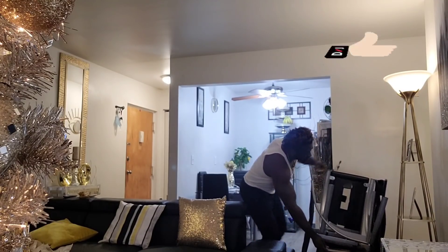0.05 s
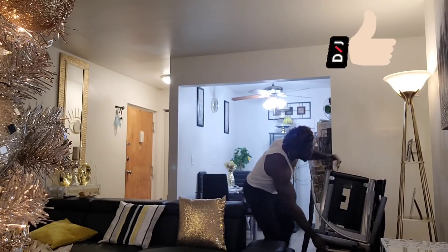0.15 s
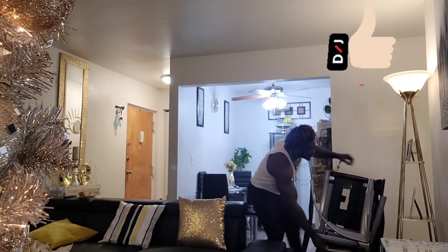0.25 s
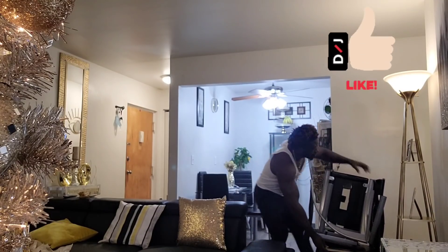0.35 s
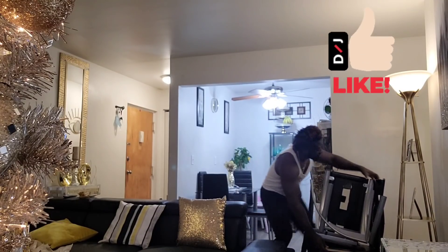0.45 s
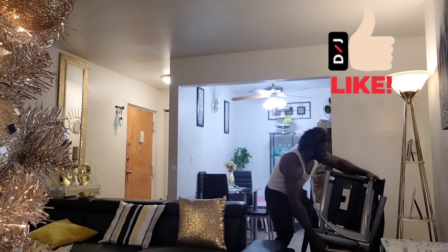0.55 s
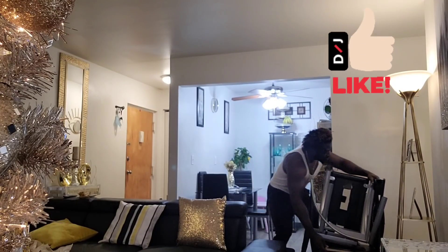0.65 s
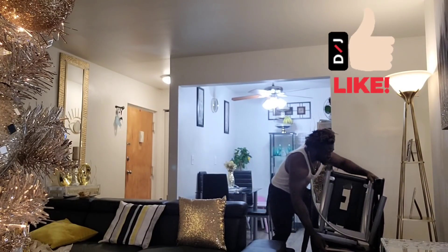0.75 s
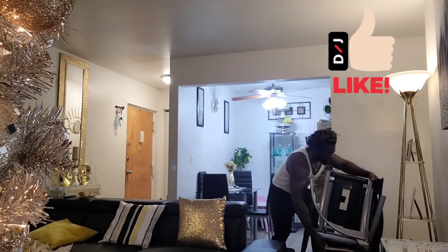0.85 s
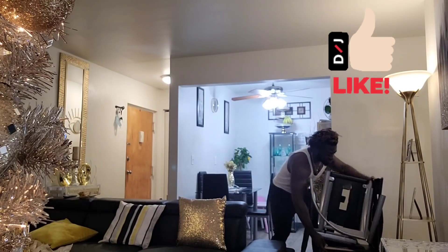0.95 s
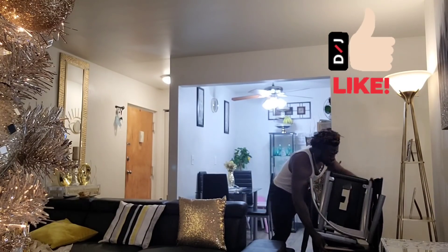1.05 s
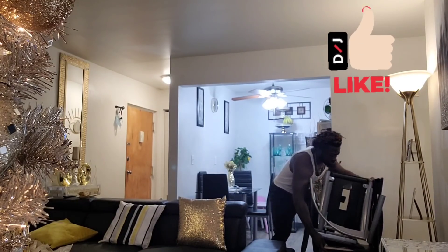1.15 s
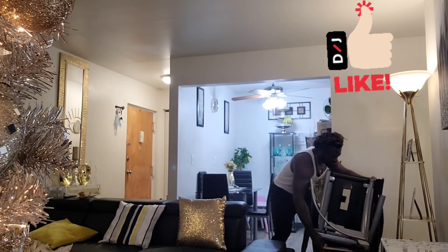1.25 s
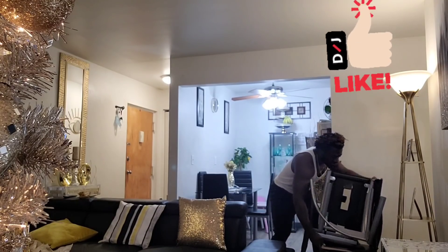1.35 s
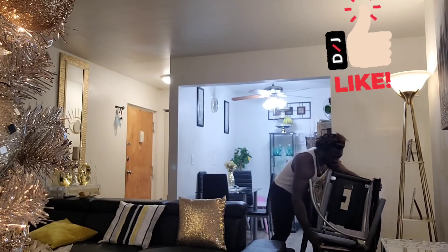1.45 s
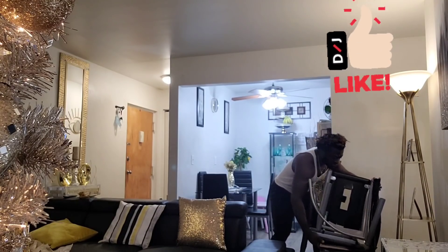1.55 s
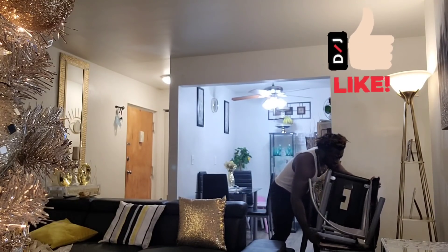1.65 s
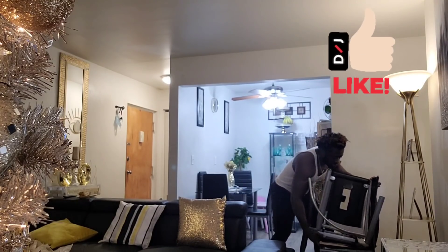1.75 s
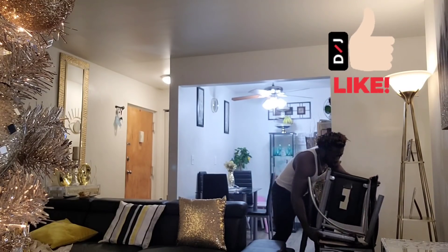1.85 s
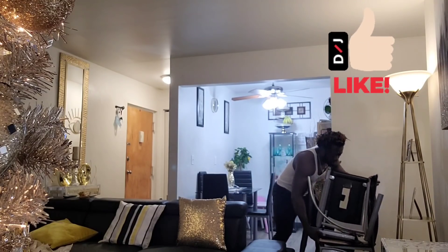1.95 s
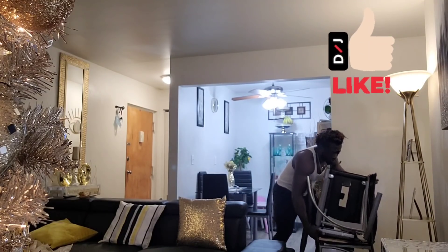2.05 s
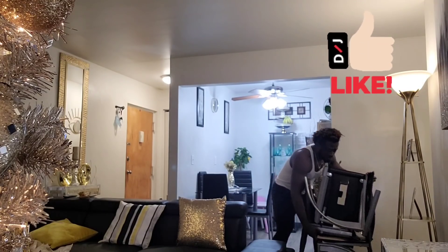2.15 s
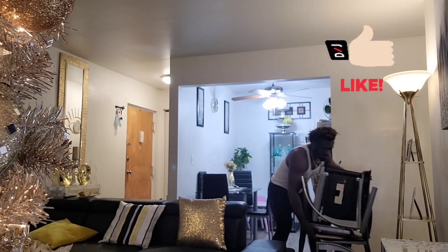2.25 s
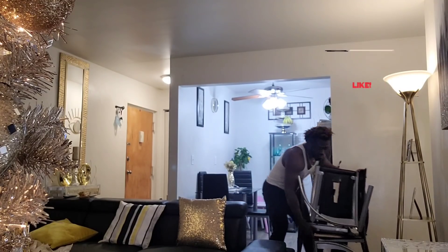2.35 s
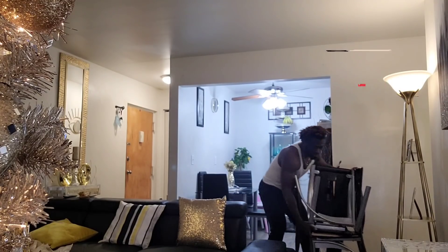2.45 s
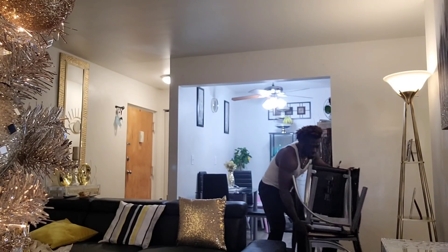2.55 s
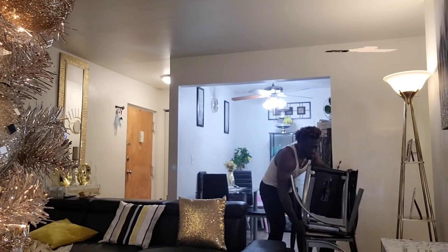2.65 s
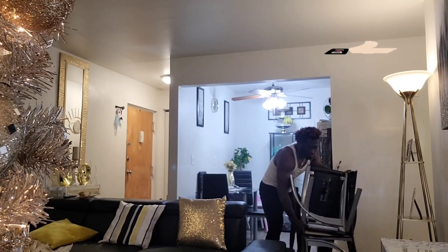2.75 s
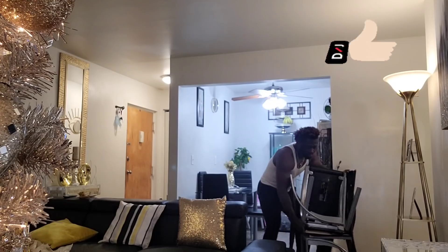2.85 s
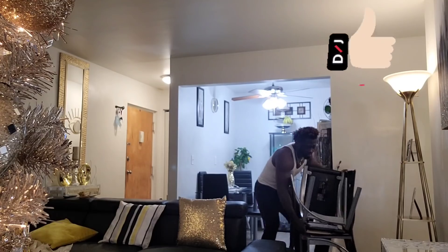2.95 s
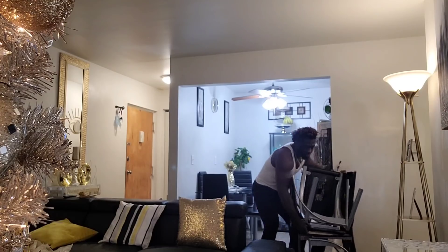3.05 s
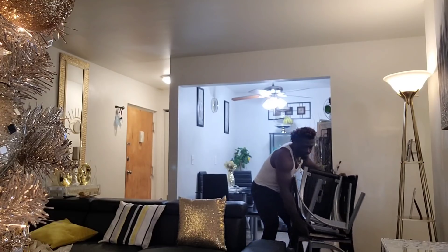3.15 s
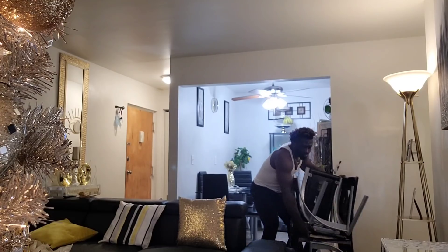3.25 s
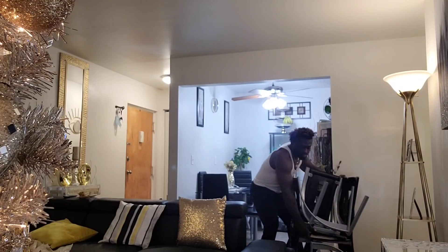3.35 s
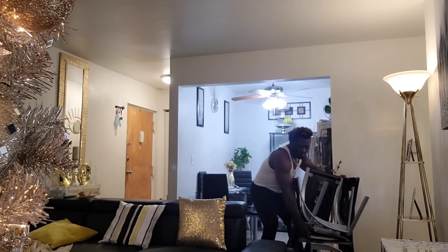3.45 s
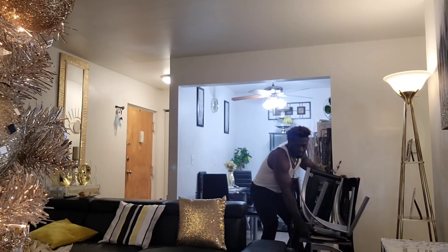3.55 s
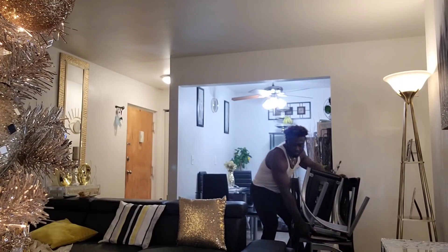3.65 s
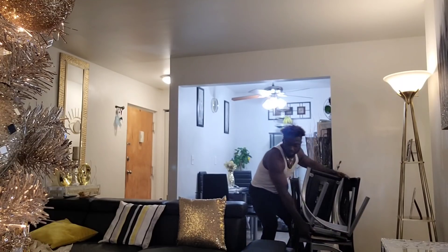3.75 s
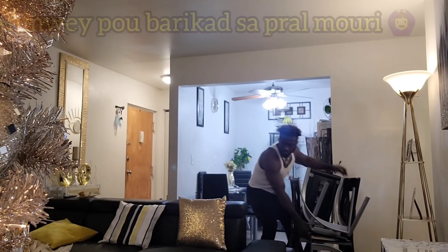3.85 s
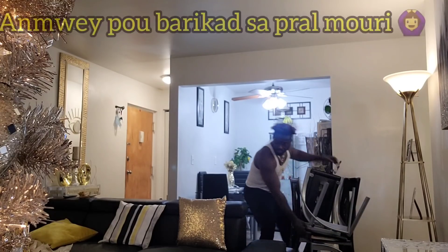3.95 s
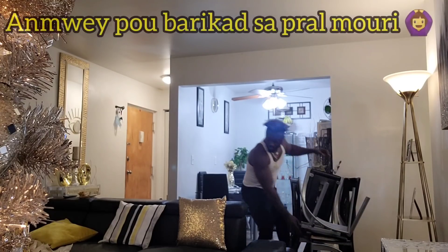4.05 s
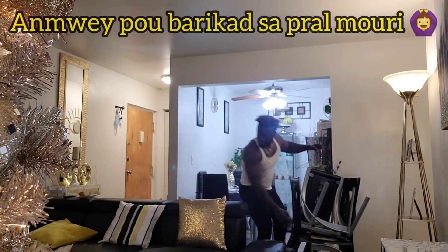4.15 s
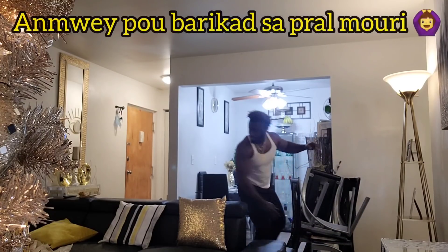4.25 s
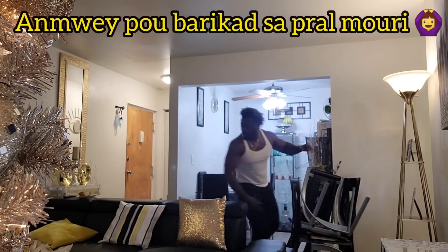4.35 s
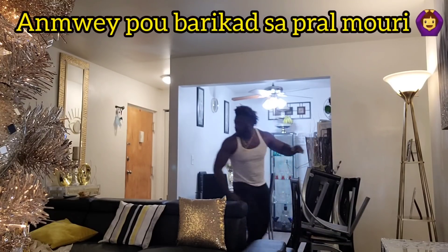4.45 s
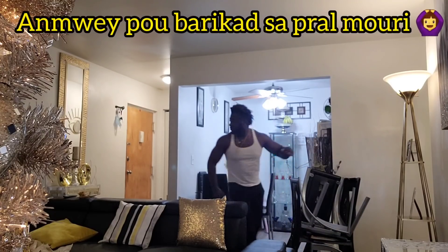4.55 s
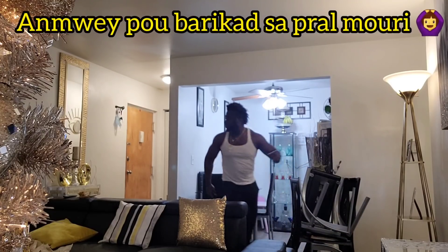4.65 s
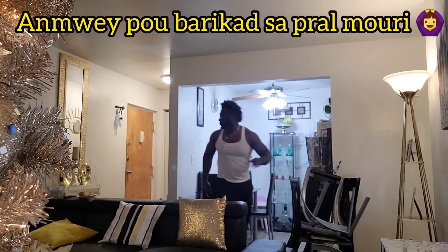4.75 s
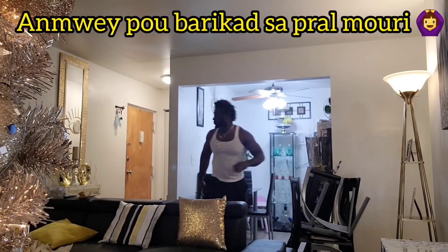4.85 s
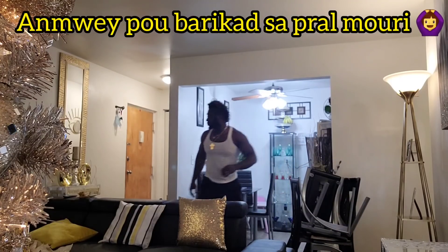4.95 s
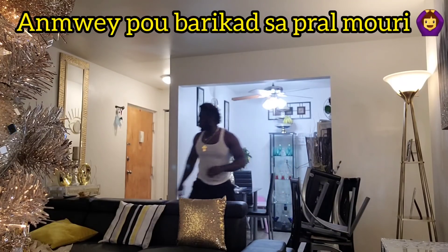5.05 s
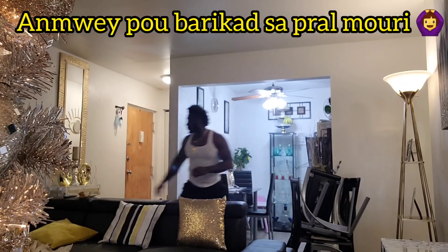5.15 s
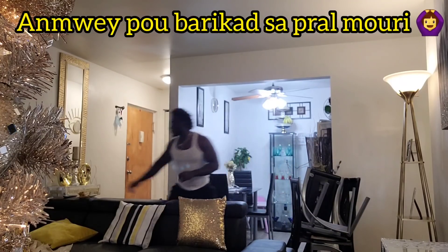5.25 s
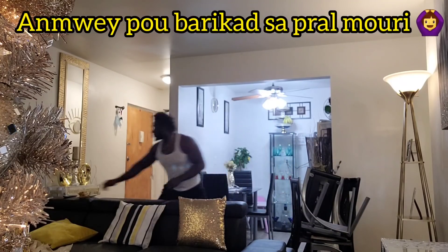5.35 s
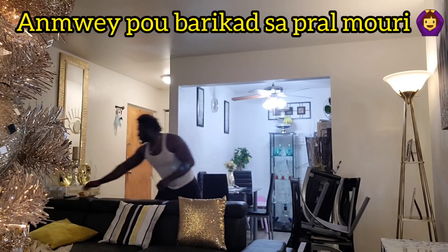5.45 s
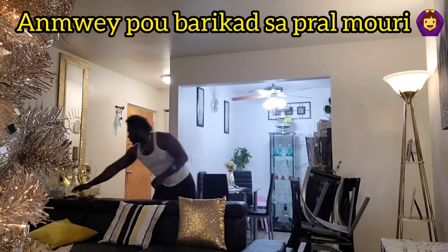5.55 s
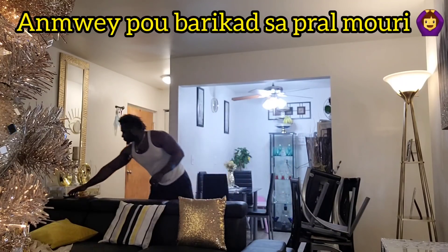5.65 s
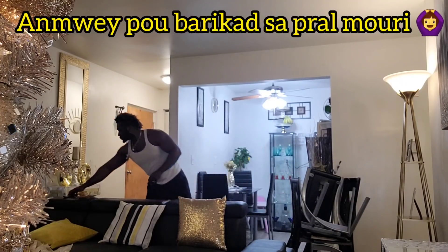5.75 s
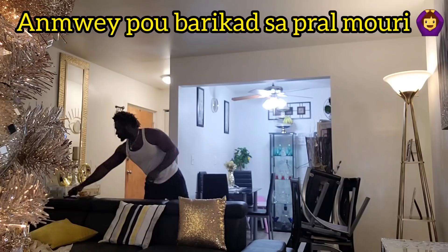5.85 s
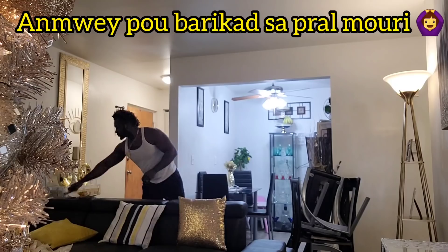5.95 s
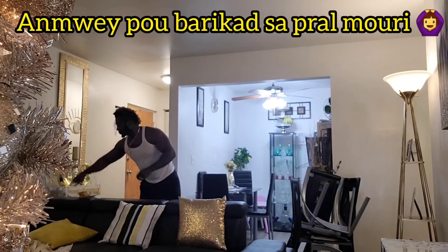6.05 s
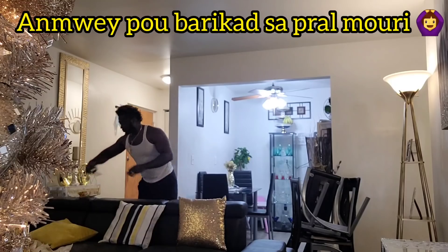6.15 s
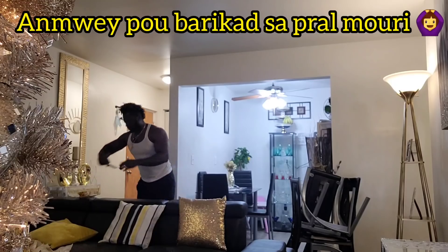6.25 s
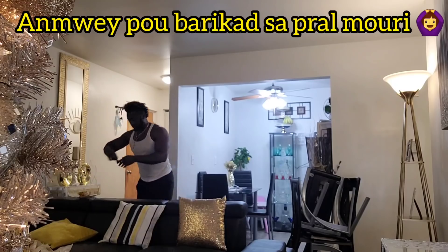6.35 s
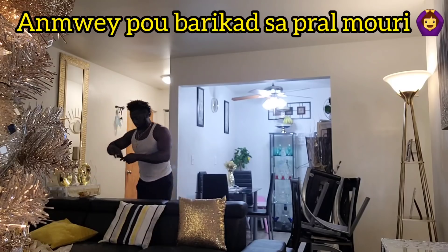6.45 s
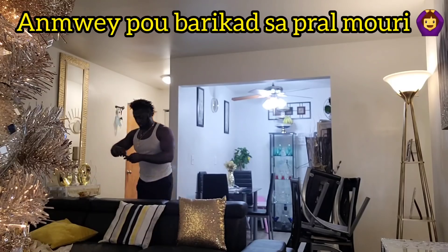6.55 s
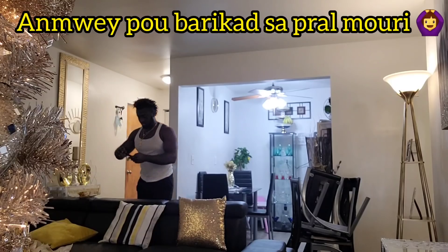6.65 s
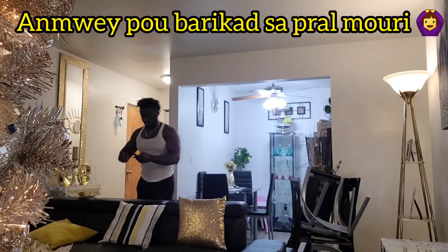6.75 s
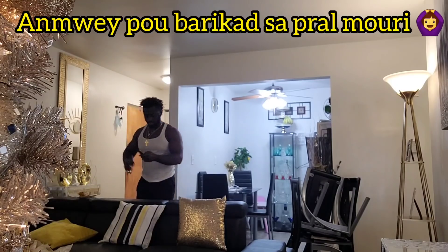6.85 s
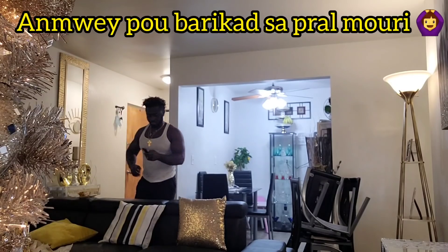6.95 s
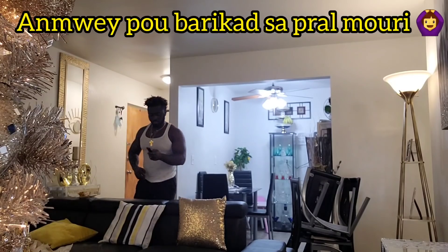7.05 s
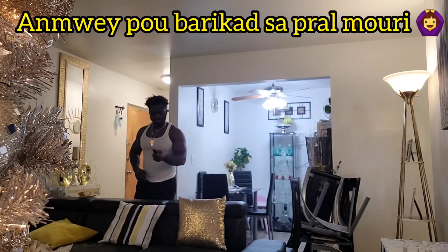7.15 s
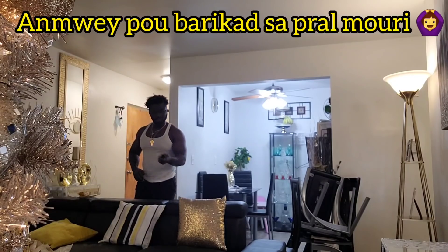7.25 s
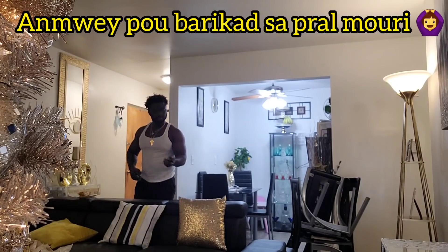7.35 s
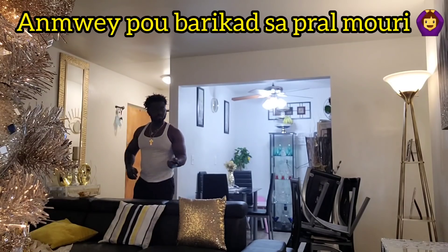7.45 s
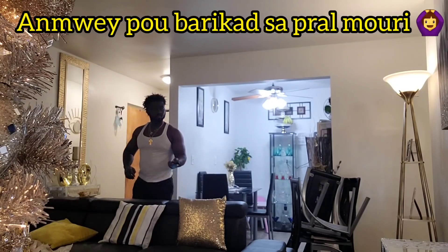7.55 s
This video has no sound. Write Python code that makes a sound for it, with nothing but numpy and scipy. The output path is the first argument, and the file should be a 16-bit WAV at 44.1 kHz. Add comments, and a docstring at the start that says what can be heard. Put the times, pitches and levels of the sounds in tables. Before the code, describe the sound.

Chair frames bang and rattle as they are stacked for about three seconds, then quiet movement, clock ticks and a low steady fan remain.

```python
"""Stacking chairs in a living room

Metal-framed chairs are shuffled and dropped onto a stack: chattering blows ring seats and tubes.
The person's clothes swish (filtered noise) and a small chain jingles (decaying sines) before they walk off.
A wall clock ticks once a second (clicks into case resonances) over a fan's steady air noise and hum."""
import sys
import numpy as np
from scipy import signal
from scipy.fft import rfft, irfft, next_fast_len
from scipy.io import wavfile
from scipy.ndimage import uniform_filter1d

SR = 44100
rng = np.random.default_rng(int(sys.argv[2]) if len(sys.argv) > 2 else 0)


def wav_record(signal):
    """Record a signal, one row per channel, as 16-bit PCM in the file named by sys.argv[1]."""
    frames = np.transpose(np.atleast_2d(signal))
    bounded = np.clip(frames, -1, 1)
    # unit amplitude maps onto the largest positive 16-bit level
    quanta = np.round(bounded * 32767).astype(np.int16)
    wavfile.write(sys.argv[1], SR, quanta)


N = 335547
TIME = np.arange(N) / SR
RING_SIZE = int(0.6 * SR)  # samples in one ringing sound
AGE = TIME[:RING_SIZE]


def from_db(db):
    """Decibels to gain."""
    return 10 ** (np.asarray(db) / 20)


def rms_one(x):
    """Scale to an rms of one."""
    return x / np.sqrt(np.mean(x ** 2) + 1e-30)


def add(out, start_s, sound):
    """Mix a sound in from start_s on."""
    start = max(0, round(start_s * SR))
    out[..., start:start + sound.shape[-1]] += sound[..., :N - start]


def low_pass(x, cutoff_hz, order):
    """Causal Butterworth low-pass."""
    return signal.sosfilt(signal.butter(order, cutoff_hz, fs=SR, output="sos"), x)


def band(x, low_hz, high_hz, order=3):
    """Causal Butterworth band-pass."""
    return signal.sosfilt(signal.butter(order, [low_hz, high_hz], "band", fs=SR, output="sos"), x + 1e-18)


def colour(x, spectrum):
    """Causal minimum-phase filter through (Hz, dB) points, built by folding the cepstrum."""
    size = 2 * next_fast_len(x.shape[-1] // 2 + 2000)
    hz, db = np.transpose(spectrum)
    bins_hz = np.arange(size // 2 + 1) * SR / size
    gain = from_db(np.interp(np.log(bins_hz + 1), np.log(hz), db))
    cepstrum = irfft(np.log(gain))
    cepstrum[1:size // 2] *= 2
    cepstrum[size // 2 + 1:] = 0
    return irfft(rfft(x, size) * np.exp(rfft(cepstrum)))[..., :x.shape[-1]]


def resonate(x, hz, width_hz):
    """Two-pole resonance with a peak gain of one."""
    r = np.exp(-np.pi * width_hz / SR)
    zeros = np.array([1, 0, -1]) * (1 - r * r) / 2
    poles = [1, -2 * r * np.cos(2 * np.pi * hz / SR), r * r]
    return signal.lfilter(zeros, poles, x + 1e-18)


def ring(modes):
    """Sum of decaying sines, one per mode (Hz, dB, t60 s)."""
    return sum(np.sin(2 * np.pi * hz * AGE) * from_db(db - 60 * AGE / t60_s) for hz, db, t60_s in modes)


def pan(db):
    """Gains of the two channels for a left-right difference."""
    return from_db(np.array([[db], [-db]]) / 2)


def diffuse(size, alike_hz=300, apart_db=-17):
    """Noise from all sides: the two channels agree mainly in the bass."""
    mid, side, apart = rng.standard_normal((3, size))
    side = signal.sosfilt(signal.butter(3, alike_hz, "high", fs=SR, output="sos"), side)
    side = side + from_db(apart_db) * apart
    return rms_one(mid + side * [[1], [-1]])


def room(t60_s, wet_db, early_db=-1, early_s=0.0064, late_db=-23, late_t60_s=1.0):
    """Room response: direct sound, dense near-wall echoes, a tail, a faint tail from the rooms next door."""
    tail_fade = from_db(-60 * AGE / t60_s)
    early_fade = from_db(early_db) * np.exp(-AGE / early_s)
    late_fade = from_db(late_db - 60 * AGE / late_t60_s)
    onset = 1 - np.exp(-AGE / 0.003)
    tail = diffuse(RING_SIZE, alike_hz=320) * (tail_fade + early_fade + late_fade) * onset
    response = from_db(wet_db) * rms_one(tail) / np.sqrt(RING_SIZE)
    response[:, 0] += 1  # direct sound
    return response


def heard(x, response):
    """A dry sound carried through the room."""
    return signal.fftconvolve(x[None], response, axes=1)[:, :len(x)]


def contact(peak_s, per_s=4500, swell=2.3):
    """Loose parts chatter: random touches swell up to peak_s, then die away; unit energy."""
    chatter = (rng.random(RING_SIZE) < per_s / SR) * rng.standard_normal(RING_SIZE)
    progress = swell * AGE / peak_s
    return rms_one(chatter * progress ** swell * np.exp(-progress)) / np.sqrt(RING_SIZE)


def wavering(hz, waver=0.15, drift_s=0.33):
    """Motor tone of about unit rms whose strength and phase [rad] wander a little."""
    noise = rng.standard_normal((2, N))
    wander = signal.fftconvolve(noise, np.hanning(int(drift_s * SR))[None], "same", axes=1)
    swell, phase = waver * rms_one(wander)
    return np.sqrt(2) * (1 + swell) * np.sin(2 * np.pi * (hz * TIME + rng.random()) + phase)


# fan air, low rumble, relative: (frequency [Hz], density [dB per Hz])
FAN_RUMBLE = [(25, -27.5), (50, -13), (72, -7), (91, -15.5), (115, -8.5), (170, -6.5), (225, -4), (300, -5),
              (390, -2), (520, -13), (700, -14.5), (1000, -23), (1200, -17.5), (1400, -23)]
# fan air, faint hiss, relative: (frequency [Hz], density [dB per Hz])
FAN_HISS = [(1400, 18), (2000, 9.5), (5500, -13.5), (6800, 1.5), (7700, 8), (8700, 1.5), (15500, -5.5)]
# motor tones: (frequency [Hz], rms level before pan [dB])
FAN_HUM = [(49, -74.5), (66, -74), (120, -76.5), (131, -72.5), (196, -60), (295, -67), (311, -67.5),
           (524, -74)]


def fan(rumble_db=-58, hiss_db=-77, edge_hz=1470, pan_db=-3.5):
    """Steady air noise cut off above edge_hz, wavering motor tones and a faint hiss."""
    edge = signal.cheby1(10, 0.5, edge_hz, fs=SR, output="sos")
    rumble = from_db(rumble_db) * rms_one(signal.sosfilt(edge, colour(diffuse(N), FAN_RUMBLE)))
    hum = sum(from_db(db) * wavering(hz) for hz, db in FAN_HUM)
    hiss = from_db(hiss_db) * rms_one(colour(diffuse(N), FAN_HISS))
    return pan(pan_db) * (rumble + hum) + hiss


def swish(peak_s, length_s, fade_ratio=1.09):
    """Bell-shaped (sech) swell; length_s is its width at half height before the fall is slowed."""
    away = 2 * np.arccosh(2) * (TIME - peak_s) / max(length_s, 0.02)
    fall = np.exp(-np.minimum(np.maximum(-away, away / fade_ratio), 20))
    return 2 * fall / (1 + fall ** 2)


# rubbing fabric, relative: (frequency [Hz], density [dB per Hz])
FABRIC_SPECTRUM = [(300, 4), (800, 8), (1400, 3.5), (2300, -2), (4000, -2.5), (6000, -3), (7700, -1),
                   (9000, -6), (15500, -3)]
# dull tail of a knock at the start, then reaches, lifts and strides:
# (peak time [s], relative level [dB], length [s], treble against body [dB])
SWELLS = [(0.01, -57, 0.07, -25), (0.24, -61.5, .3, -20), (0.73, -63, 0.16, -1), (1.05, -65, 0.29, -17),
          (1.382, -53.5, 0.2, -2), (1.645, -59.5, 0.26, -13), (1.999, -62, 0.21, -9),
          (2.239, -45.5, 0.12, 1), (2.403, -63.5, 0.19, 3), (2.524, -48.5, .22, -3.5),
          (2.942, -51.5, 0.18, -2), (3.285, -50.5, 0.12, -6), (3.542, -65, 0.15, -8),
          (4.132, -55, .12, -2.5), (4.724, -59, 0.15, -4), (4.783, -59, 0.094, -21),
          (5.494, -53.5, .18, -2), (6.504, -73.5, 0.14, 3), (7.074, -70, 0.075, -3),
          (7.348, -71.5, 0.096, -14.5)]
# faint rustle between swishes, stronger while chairs are handled: (time [s], relative level [dB])
CLOTHES_RUSTLE = [(0, -68), (.36, -64.5), (.52, -73.5), (1.1, -70.5), (3.3, -63), (3.75, -79), (5.8, -76),
                  (7.6, -83.5)]


def clothes(level_db=4.5, grain_db=1.5, split_hz=8500, rustle_treble_db=1.5, treble_lead_s=0.015, pan_db=-2):
    """Fibres slip in countless tiny catches; swells rise from a faint rustle and dull as they end."""
    grain = rms_one(uniform_filter1d(rng.standard_normal(N), size=60))
    catches = from_db(grain_db * grain)
    rub = rms_one(band(colour(diffuse(N) * catches, FABRIC_SPECTRUM), 290, 19000, order=2))
    dull = signal.sosfiltfilt(signal.butter(3, split_hz, fs=SR, output="sos"), rub)
    bright = rub - dull
    rustle = from_db(np.interp(TIME, *np.transpose(CLOTHES_RUSTLE)))
    body_power = rustle ** 2
    treble_power = (rustle * from_db(rustle_treble_db)) ** 2
    for peak_s, db, length_s, treble_db in SWELLS:
        body = from_db(db) * swish(peak_s, length_s)
        treble = from_db(db + treble_db) * swish(peak_s - treble_lead_s, length_s)
        body_power = body_power + body ** 2
        treble_power = treble_power + treble ** 2
    cloth = dull * np.sqrt(body_power) + bright * np.sqrt(treble_power)
    return cloth * from_db(level_db) * pan(pan_db)


def blow(chatter_s, landing_s, weight_db=4, soft_hz=520, chatter_hz=450):
    """Force of a knock: the weight lands as one soft push amid the bright chatter."""
    push = np.zeros(RING_SIZE)
    add(push, landing_s, from_db([weight_db]))
    push = low_pass(push + 1e-18, soft_hz, order=2)
    return push + band(contact(chatter_s), chatter_hz, 19000, order=2)


# dense crack of the contact, relative: (frequency [Hz], density [dB per Hz])
CRACK_SPECTRUM = [(50, -7), (120, -12.5), (200, 0.5), (450, -1), (1000, 4), (2000, -5), (2700, -6.5),
                  (4500, -6.5), (5400, -7), (8000, -11.5), (9000, -15), (15500, -12)]
# chair resonances, seat first, then tubes: (frequency [Hz], width [Hz], relative level [dB])
CHAIR_MODES = [(82.4, 26, -8.5), (164.5, 6.8, 7), (221.3, 7.4, 8.5), (271, 29, 8), (329, 20, 5),
               (389, 30, -6), (437, 13, 2.5), (553, 35.5, 0), (671, 35, -2.5), (755, 32, -2),
               (835, 26, -4.5), (885, 25, -2.5), (1166, 43, -2), (1320, 20, -5), (1640, 40, -10),
               (1875, 120, -3), (2350, 25, -21), (2550, 73, -7), (2760, 44, -11), (3257, 60, -7),
               (3480, 37, -10.5), (3666, 65, -11), (4130, 130, -16.5), (4335, 260, -20.5),
               (4800, 110, -9.5), (5560, 90, -19), (7140, 87, -18), (7200, 160, -11)]


def chair(force, favoured_hz, favour_db=6, favour_width=0.2, vary_db=2, modes_db=2):
    """The struck spot passes a band of the force best; seat and tubes ring with it."""
    force = force + from_db(favour_db) * resonate(force, favoured_hz, favour_width * favoured_hz)
    out = colour(force, CRACK_SPECTRUM)
    for hz, width_hz, db in CHAIR_MODES:
        mode_db = db + modes_db + vary_db * rng.standard_normal()
        out = out + from_db(mode_db) * resonate(force, hz, width_hz)
    return out


# knocks; a soft contact falls off steeply either side of its pitch, a hard one hardly:
# (time [s], relative level [dB], favoured pitch [Hz], fall-off [dB per octave], chatter peak [s])
CHAIR_KNOCKS = [(0.003, -51.5, 463, 3, 0.0032), (0.211, -48, 1050, 10.5, 0.014),
                (0.466, -52.5, 760, 12, 0.0038), (0.601, -49.5, 268, 8, .012), (0.692, -47, 690, 7.5, .007),
                (0.796, -52.5, 382, 5.5, 0.0038), (0.876, -66.5, 3620, 1, 0.022),
                (0.936, -56, 3550, 16, 0.0092), (1.095, -42, 1290, 4.5, .004),
                (1.212, -49, 280, 4.5, 0.0062), (1.436, -37, 298, 6.5, 0.0074),
                (1.719, -39, 260, 8.5, .009), (1.821, -66, 8100, 34, 0.0071), (2.145, -36, 154, 1.24, .009),
                (2.166, -25.5, 208, 3, 0.0091), (2.186, -34, 422, 3.5, .011),
                (2.188, -41.5, 7800, 9.5, .012), (2.403, -44, 1200, 6.5, .005),
                (2.483, -26, 4290, 6.5, .007), (2.484, -21, 200, 4, 0.0085),
                (2.492, -25.5, 1400, 4, 0.0048), (2.646, -38.5, 895, 3.5, .0052),
                (2.664, -38.5, 7900, 0, 0.0084), (2.678, -28, 4550, 3, .0047),
                (2.69, -32.5, 1600, 4.5, .009), (2.726, -26, 420, 3, 0.0044), (2.93, -36, 1410, 4, 0.0053),
                (3.078, -52, 8000, 1, 0.0032), (3.109, -46, 600, 3.5, 0.0036), (3.169, -47, 417, 5, 0.0062),
                (3.28, -50, 1230, 1.5, 0.015), (3.304, -45.5, 290, 1, 0.0083), (3.329, -38.5, 82, 6, .009),
                (3.338, -42, 3400, 2, 0.0086), (4.36, -60, 1715, 6.5, .014), (4.828, -55.5, 1500, 5.5, .01),
                (5.352, -61, 1650, 6, 0.0093), (5.801, -63, 1005, 7.5, .0061),
                (6.241, -61.5, 1220, 13, 0.0056), (6.335, -67.5, 1314, 6.5, 0.0078),
                (7.479, -75.5, 2670, 0, 0.0054)]
# thud, clank, clink, tick: (low edge [Hz], high edge [Hz], centre for the fall-off [Hz],
# relative level [dB], room t60 [s], room level [dB], left-right difference [dB])
KNOCK_REGISTERS = [(44.72, 485, 320, 2, 0.28, 5, -0.5), (459.6, 1860, 1200, 0.5, 0.28, 7.5, -4.5),
                   (1900, 4420, 6000, 1, 0.29, 10.5, -1.2), (5100, 17000, 12000, -2, 0.25, 4.5, -1)]


def knocks(lead=0.8):
    """Blows ring chair and room; a register weakens with its distance from the pitch of the blow."""
    out, onset = np.zeros((2, N)), AGE < 0.04
    centres_hz = np.array(KNOCK_REGISTERS)[:, 2]
    for time_s, level_db, favoured_hz, falloff_db, chatter_s in CHAIR_KNOCKS:
        landing_s = lead * chatter_s  # first light touches precede the weight
        ringing = chair(blow(max(chatter_s, 0.002), landing_s), favoured_hz)
        octaves = np.abs(np.log2(centres_hz / favoured_hz))
        levels_db = level_db - falloff_db * (octaves - octaves.min())
        for db, register in zip(levels_db, KNOCK_REGISTERS):
            low_hz, high_hz, _, register_db, t60_s, wet_db, pan_db = register
            sound = heard(band(ringing, low_hz, high_hz, order=4), room(t60_s, wet_db))
            # levels are rms over the onset, per channel
            onset_rms = np.sqrt(np.mean(sound[:, onset] ** 2, axis=1, keepdims=True))
            add(out, time_s - landing_s, from_db(db + register_db) * pan(pan_db) * sound / onset_rms)
    return out


# gear-train contacts in one beat: (time from beat [s], relative level [dB])
CLOCK_GEARS = [(-.020, -7.5), (-.011, 2.5), (-.002, -1), (.003, -3)]
# clock case resonances: (frequency [Hz], width [Hz], relative level [dB])
CLOCK_CASE = [(1400, 520, 3.5), (2600, 400, 0), (3260, 440, -2.5), (4220, 340, 5), (4660, 500, -14.5),
              (5400, 520, -15.5), (6450, 460, -5), (7100, 580, -17.5), (11540, 6000, -24)]


def clock(level_db=7, pan_db=-8, rattle_db=-3, rattle_s=0.0033, vary_db=3, jitter_s=0.0015,
          first_beat_s=0.032, beat_s=1, beat_db=-39.5, fade_db_per_s=0.75):
    """Each second the gears step in quick, rattling, varied contacts that ring the case; ticks grow fainter."""
    clicks = np.zeros(N)
    for time_s in np.arange(first_beat_s, N / SR, beat_s):
        for offset_s, gear_db in CLOCK_GEARS:
            touch_s = time_s + offset_s + jitter_s * rng.standard_normal()
            db = beat_db - fade_db_per_s * time_s + gear_db + vary_db * rng.standard_normal()
            add(clicks, touch_s, from_db([db]))
            add(clicks, touch_s - rattle_s, from_db(db + rattle_db) * contact(rattle_s))
    ticks = sum(from_db(db) * resonate(clicks, hz, width_hz) for hz, width_hz, db in CLOCK_CASE)
    return from_db(level_db) * pan(pan_db) * heard(ticks, room(0.17, 7.9, early_db=14.5, early_s=0.0045))


# shakes of the chain: (time [s], length [s], relative level of first touch [dB])
CHAIN_SHAKES = [(0.561, .15, -55), (1.077, .02, -58), (3.93, .02, -67), (4.621, .02, -60.5),
                (6.162, .02, -54), (6.27, .065, -61.5)]
# link modes: (frequency [Hz], relative level [dB], t60 [s])
CHAIN_LINKS = [(6560, -11.5, 0.08), (6640, -21, 0.19), (7850, -18, 0.099), (9340, -19, .08),
               (13000, -37, 0.11), (14700, -24, .08)]


def chain(level_db=-1, click_db=-8, click_s=0.021, touch_gap_s=0.042, touch_swell_db=2.5):
    """Small links ring high and rattle in a run of touches per shake, each harder than the last."""
    out = np.zeros((2, N))
    for time_s, length_s, shake_db in CHAIN_SHAKES:
        for touch, after_s in enumerate(np.arange(0, length_s, touch_gap_s)):
            ringing = ring([(hz, db + rng.standard_normal(), t60_s) for hz, db, t60_s in CHAIN_LINKS])
            noise = band(rng.standard_normal(RING_SIZE), 7300, 19845)
            rattle = from_db(click_db) * noise * np.exp(-AGE / click_s)
            touch_db = shake_db + level_db + touch_swell_db * touch
            add(out, time_s + after_s, from_db(touch_db) * heard(ringing + rattle, room(0.48, 8.8)))
    return out


# modes of one frame tube: (frequency [Hz], relative level [dB], t60 [s])
TUBE_MODES = [(3290, -3, .15), (3500, -3, 0.22), (3520, -1, 0.16)]


def tube(settle_s=3.352, level_db=-48.5):
    """A frame tube, left free as the top chair settles, rings on thinly."""
    out = np.zeros((2, N))
    add(out, settle_s, from_db(level_db) * heard(ring(TUBE_MODES), room(0.27, 0)))
    return out


def scene():
    """Everything that sounds in the room."""
    return fan() + clothes() + knocks() + clock() + chain() + tube()


def record(dry, cutoff_hz=15850):
    """Steep elliptic low-pass cuts the top."""
    return signal.sosfilt(signal.ellip(12, 0.2, 80, cutoff_hz, fs=SR, output="sos"), dry)


dry = scene()
out = record(dry)
wav_record(out)
```